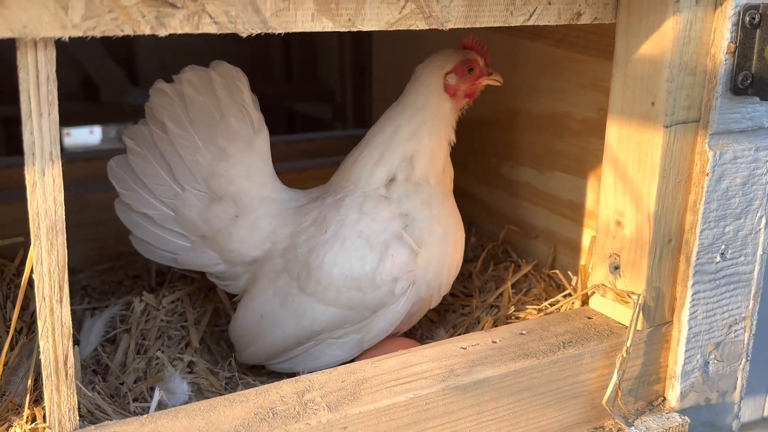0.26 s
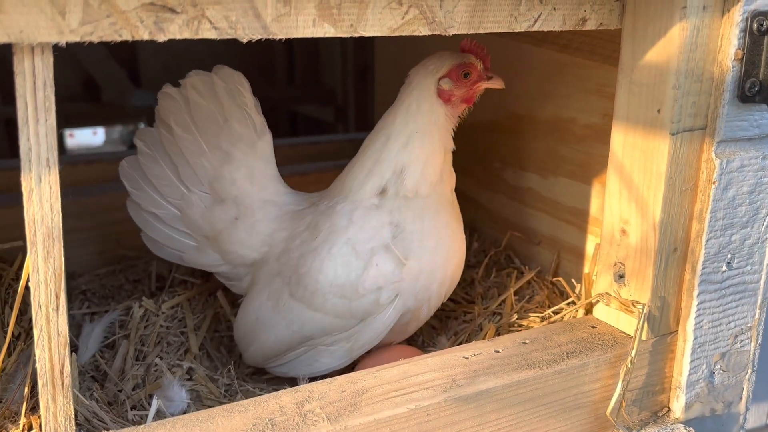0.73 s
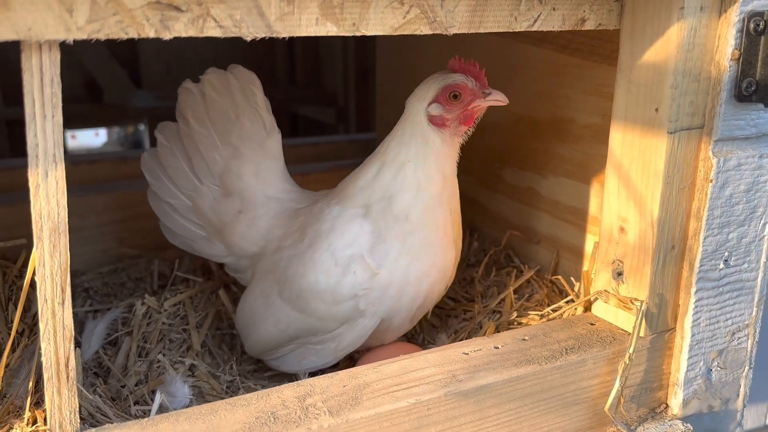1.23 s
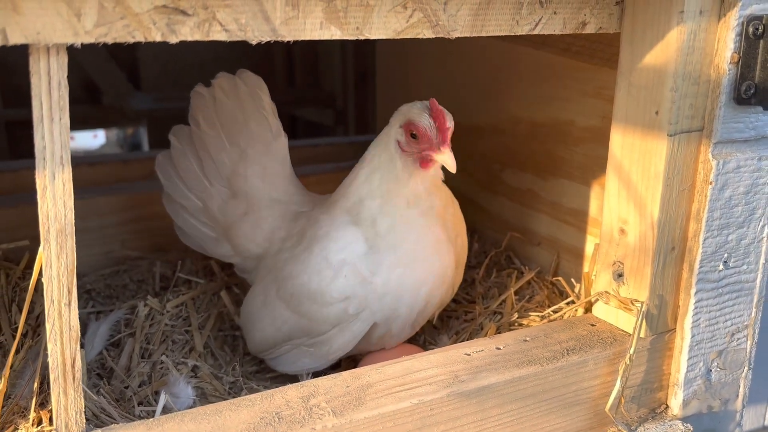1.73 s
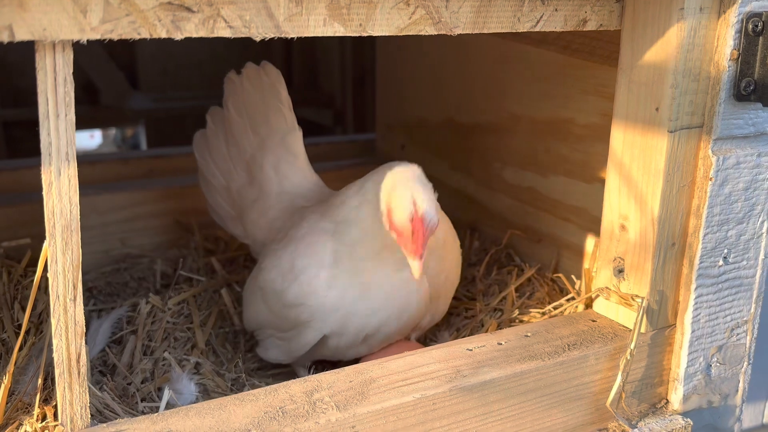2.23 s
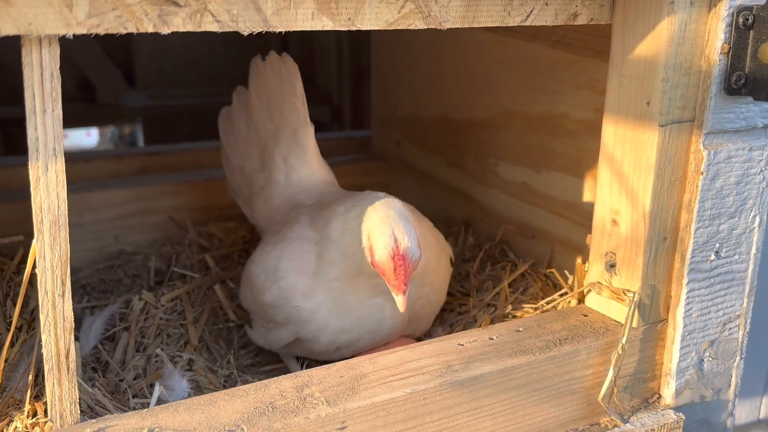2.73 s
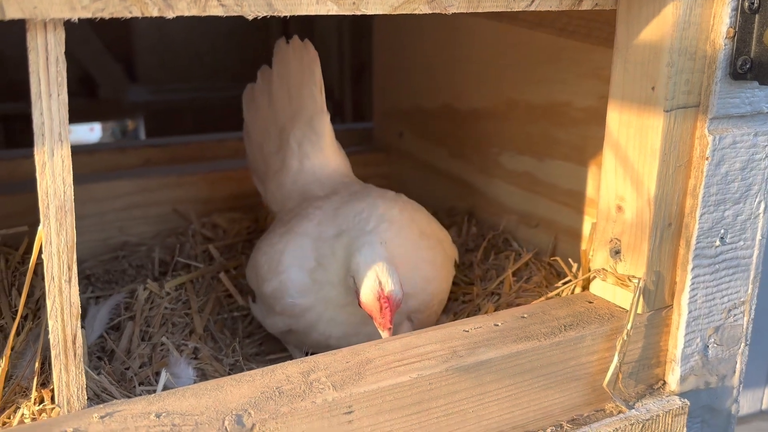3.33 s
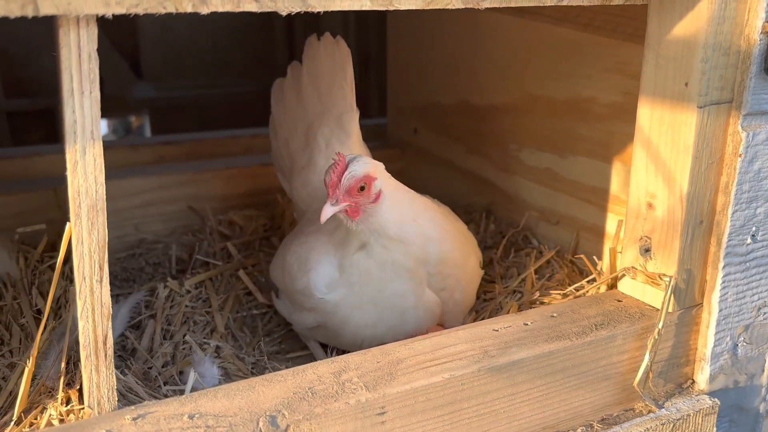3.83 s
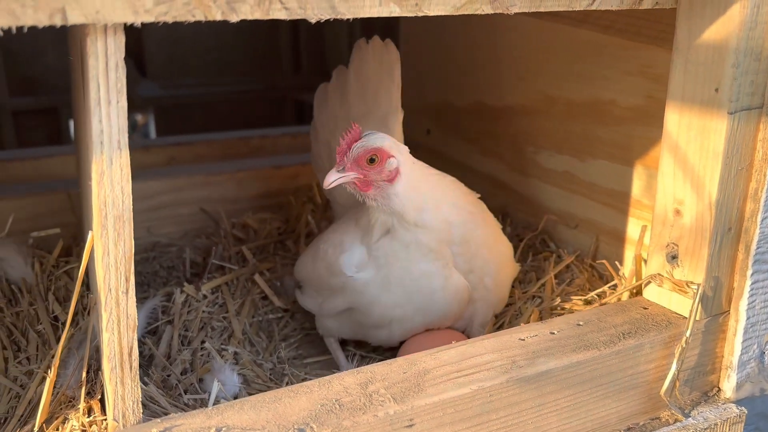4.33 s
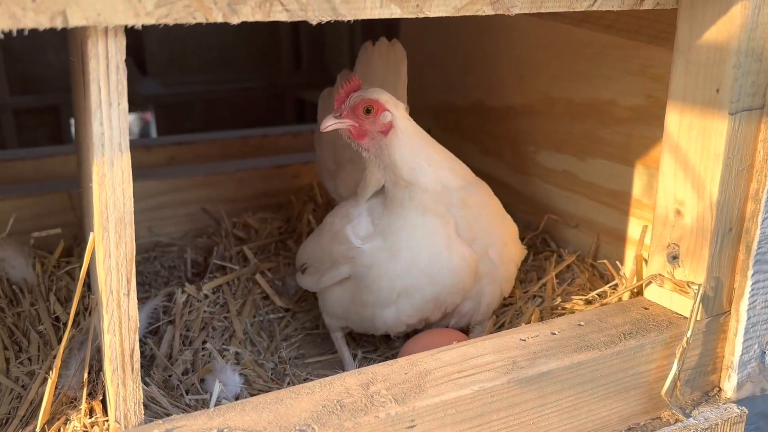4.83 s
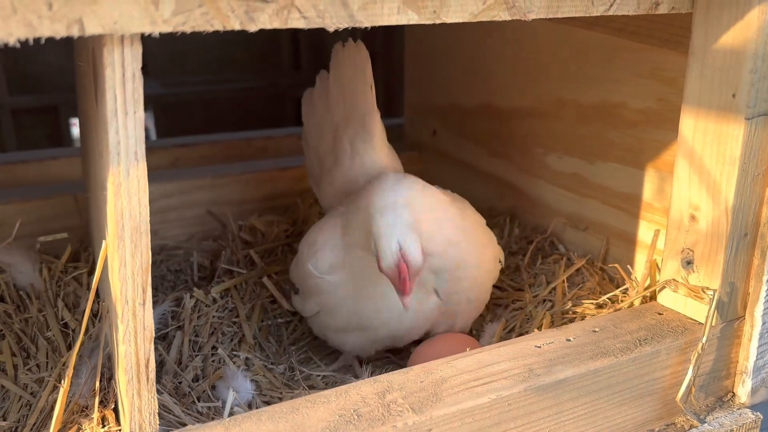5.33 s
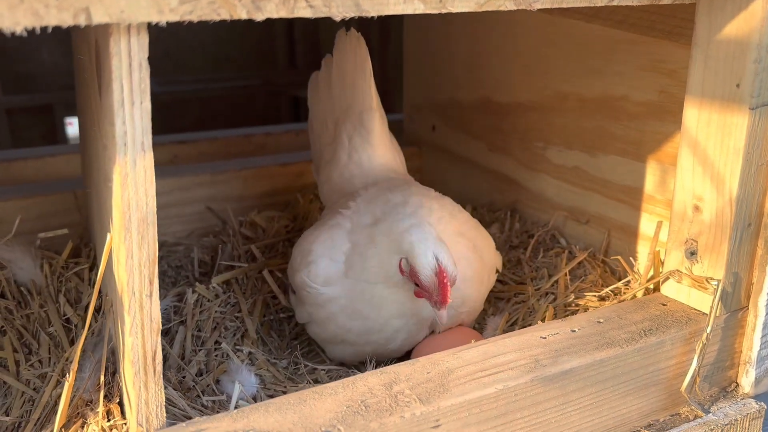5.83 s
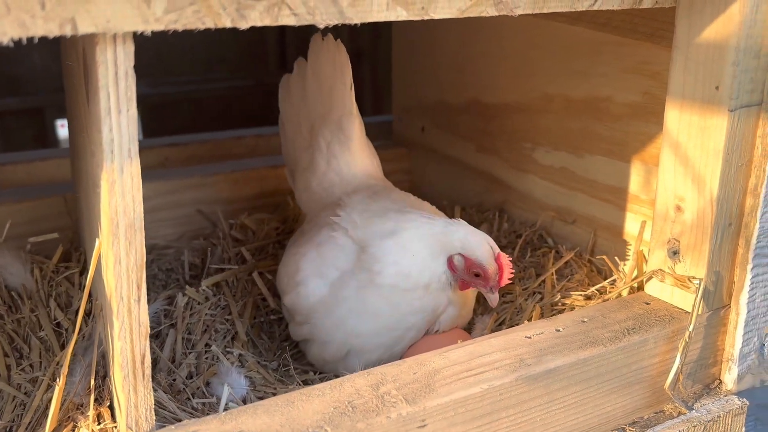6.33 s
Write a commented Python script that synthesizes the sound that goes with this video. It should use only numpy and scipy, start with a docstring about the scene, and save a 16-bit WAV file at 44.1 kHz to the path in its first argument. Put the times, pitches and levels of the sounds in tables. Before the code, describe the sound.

A hen is close to the microphone in a wooden nest box, over quiet outdoor air and a steady low hum. She starts with four short clucks and soft wheezes, then gives a loud, drawn-out squawk from about 0.8 to 1.1 seconds. A strong cluck at 1.3 seconds begins a run of softer, sometimes raspy ones, about four a second, until 3.8 seconds. A brief hollow hiss comes at 3 seconds. A second loud squawk follows at about 3.9 seconds. After it come breathy wheezes until 5.5 seconds and quieter, lower, more widely spaced clucks up to the end at 6.5 seconds. From about 4.8 seconds straw rustles faintly, with a few small snaps and soft, low bumps between 5.6 and 6.3 seconds as she settles. A distant small bird gives very faint, thin whistles near 1.7 and 5.1 seconds.

```python
"""A hen cackles close by in a plywood nest box: short arched clucks lead up to two long squawks.
Her voice is a source and a filter: pulses from the syrinx, often with a doubled period, excite the
resonances of her throat and beak. Turbulent breath makes soft wheezes and one hiss.
The walls reflect her voice, and straw rustles and cracks under her as she settles.
A small bird whistles far off, and a low hum lies beneath the open air."""
import sys
import numpy as np
from scipy import signal
from scipy.fft import rfft, irfft, next_fast_len
from scipy.io import wavfile
from scipy.ndimage import uniform_filter1d

SR = 44100
rng = np.random.default_rng(int(sys.argv[2]) if len(sys.argv) > 2 else 0)


def dump_mix(stems):
    """Bounce the given channels to the path in sys.argv[1] as a 16-bit WAV at rate SR."""
    frames = np.atleast_2d(stems).T  # one column per channel
    limited = np.clip(frames, -1, 1)  # hard clip at full scale
    pcm = np.round(limited * 32767).astype(np.int16)
    wavfile.write(sys.argv[1], SR, pcm)


N = 289733
TIME = np.arange(N) / SR
BAND_LIMIT_HZ = 16500

# broad noise spectrum of the straw and the hiss: frequency_hz, gain_db
RUSTLE_SPECTRUM = [(800, -35.5), (1800, -6.5), (2700, 3.5), (4500, 1), (7000, -4), (9200, -6.5),
                   (10500, -29), (15000, -24)]
# highest treble of the clucks and squawks as heard, with a deep gap near 11.5 kHz: frequency_hz, gain_db
TOP_TREBLE = [(5000, -34), (7000, -3), (8800, 1.5), (10000, -4), (11500, -52), (13000, -1), (14300, -12),
              (16000, -10)]


def gain_of(db):
    """Decibels as an amplitude ratio."""
    return 10 ** (np.asarray(db) / 20)


def unit_rms(x):
    """Normalisation to unit mean power."""
    return x / np.sqrt(np.mean(x ** 2) + 1e-20)


def spectrum_at(points, hz):
    """Interpolation on a logarithmic frequency axis."""
    f, value = np.transpose(points)
    return np.interp(np.log(hz + 1), np.log(f + 1), value)


def add(mix, start_s, sound):
    """Superposition: a sound sums into the mix from its starting time."""
    part = mix[..., max(round(start_s * SR), 0):][..., :sound.shape[-1]]
    part += sound[..., :part.shape[-1]]


def panned(x, side_db):
    """Direction as a level difference, left minus right."""
    return x * gain_of([[side_db / 2], [-side_db / 2]])


def coloured(x, points, size=2048):
    """A minimum-phase filter with the given (frequency_hz, gain_db) response."""
    log_gain = np.log(gain_of(spectrum_at(points, abs(np.fft.fftfreq(size, 1 / SR)))))
    taps = np.fft.ifft(np.exp(np.conj(signal.hilbert(log_gain)))).real
    return signal.fftconvolve(x, taps[:size // 2])[:len(x)]


def radiated(x, facing):
    """Directivity: the left-minus-right level depends on frequency."""
    return np.array([coloured(x, [(hz, side * db / 2) for hz, db in facing]) for side in (1, -1)])


def above(x, hz):
    """A zero-phase high-pass, which stays in step with the whole sound."""
    return signal.sosfiltfilt(signal.butter(4, hz, "high", fs=SR, output="sos"), x)


def resonate(x, hz, width_hz):
    """A damped resonator with a peak gain near 1."""
    pole = np.exp(-np.pi * width_hz / SR)
    return 2 * signal.lfilter([1 - pole], [1, -pole * np.exp(2j * np.pi * hz / SR)], x).real


def air_resonances(air, modes):
    """Turbulent flow excites narrow resonances in parallel."""
    return sum(gain_of(db) * unit_rms(resonate(resonate(air, hz, width), hz, width))
               for hz, width, db in modes)


def drift(count, rate_hz):
    """Random fluctuation: low-passed noise with an rms near 1."""
    size = next_fast_len(count + SR)
    hz = np.fft.rfftfreq(size, 1 / SR)
    return unit_rms(irfft(rfft(rng.standard_normal(size)) / (1 + (hz / rate_hz) ** 4), size))[:count]


def open_air():
    """Partly coherent noise: left and right agree most in the bass, and patches of the spectrum drift."""
    # frequency_hz, relative_db
    spectrum = [(15, -36), (28, -18), (50, 2.5), (75, -10), (120, -9), (280, -15), (420, -17.5), (800, -10),
                (1450, -21), (1900, -27.5), (2500, -31), (3100, -42), (5500, -49.5), (8500, -51.5),
                (11000, -75.5), (16000, -71.5)]
    # time_s, level_db
    levels = [(0, -48.5), (2, -49.5), (4, -52.5), (5.3, -49.5), (6.5, -49.5)]
    # frequency_hz, left_right_correlation
    coherence = [(30, 0.89), (125, .92), (500, 0.54), (1500, 0.2), (6000, .3)]
    frames, hz = N // 512 + 5, np.fft.rfftfreq(2048, 1 / SR)
    left_re, left_im, other_re, other_im, patches = rng.standard_normal((5, frames, len(hz)))
    patch_db = 2 * unit_rms(uniform_filter1d(uniform_filter1d(patches, 10, 0), 16, 1))
    shared = spectrum_at(coherence, hz)
    left = left_re + 1j * left_im
    right = shared * left + np.sqrt(1 - shared ** 2) * (other_re + 1j * other_im)
    bands = np.array([left, right]) * gain_of(spectrum_at(spectrum, hz) + patch_db)
    air = signal.istft(bands.transpose(0, 2, 1), nperseg=2048, noverlap=1536)[1][:, :N]
    return unit_rms(air) * gain_of(np.interp(TIME, *np.transpose(levels)))


def hum():
    """Low partials waver under slow amplitude and phase modulation."""
    # frequency_hz, level_db
    partials = [(53, -56), (70.5, -56.5), (99.6, -56.5), (199, -69.5)]
    out = np.zeros(N)
    for hz, db in partials:
        swell = 1 + .3 * drift(N, 3)
        phase = 2 * np.pi * hz * TIME + 90 / hz * drift(N, 4)
        out += gain_of(db) * unit_rms(swell * np.sin(phase))
    return out


def far_bird():
    """Frequency modulation: thin whistles follow a parabolic arch, blurred by slight jitter."""
    # start_s, length_s, top_hz, level_db
    whistles = [(1.701, 0.6, 8610, -72), (5.13, 0.4, 9250, -66)]
    top_share, droop_per_s2 = 0.42, 1.1
    out = np.zeros(N)
    for start_s, length_s, top_hz, db in whistles:
        t = np.arange(0, length_s, 1 / SR)
        hz = top_hz * (1 - droop_per_s2 * (t - top_share * length_s) ** 2)
        cycles = np.cumsum(hz * (1 + 0.0087 * drift(len(t), 300))) / SR
        add(out, start_s, gain_of(db) * signal.windows.tukey(len(t), .5) * np.sin(2 * np.pi * cycles))
    return out


def straw():
    """Friction and fracture: feathers brush over straw in tiny impulses, and a few stalks crack."""
    # brushing: time_s, level_db
    levels = [(4.7, -96), (4.9, -63), (5.05, -75), (5.3, -68.5), (5.7, -69.5), (6, -84)]
    # fine fizz of feathers: frequency_hz, gain_db
    feathers = [(6000, -34), (10000, -20), (13000, 0), (16000, -2)]
    # cracking stalks: start_s, initial_level_db
    snaps = [(3.431, -51), (5.865, -43.5), (5.952, -58), (6.072, -42.5), (6.129, -56)]
    grains = rng.standard_normal((2, N)) * gain_of(1.4 * rng.exponential(1, (2, N)))
    out = np.array([unit_rms(coloured(side, RUSTLE_SPECTRUM))
                    + gain_of(-6) * unit_rms(coloured(side, feathers)) for side in grains])
    out *= gain_of(np.interp(TIME, *np.transpose(levels)))
    t = np.arange(600) / SR
    for start_s, db in snaps:
        add(out, start_s, gain_of(db) * rng.standard_normal((2, len(t))) * np.exp(-t / 0.00062))
    return out


def box_bumps():
    """Forced vibration: as she settles, soft pushes drive the box's low, damped resonance."""
    # start_s, length_s, level_db
    bumps = [(5.594, 0.16, -47.5), (5.976, 0.1114, -38.5), (6.176, 0.0895, -44.5)]
    out = np.zeros(N)
    for start_s, length_s, db in bumps:
        push = rng.standard_normal(round(length_s * SR))
        thud = resonate(resonate(push, 67.9, 70), 64.7, 71.9) * signal.windows.hann(len(push))
        add(out, start_s, gain_of(db) * unit_rms(thud))
    return out


def nest_box(voice, tail_db):
    """Early reflections from the near walls, then faint reverberation whose treble is weaker."""
    # a left and a right list of reflections: delay_ms, gain
    reflections = [
        [(1.9, 0.067), (3.4, 0.047), (6.3, 0.14), (10.7, .07), (19, .05), (33, 0.13)],
        [(1.3, 0.073), (2.9, 0.097), (5.6, 0.086), (11.9, 0.14), (21, 0.076), (33.2, 0.063)],
    ]
    # reverberation time of the coop: frequency_hz, t60_s
    decay_times = [(200, 0.14), (1000, 0.15), (2500, 0.12), (6000, 0.41), (15000, 0.12)]
    # phase difference between the channels: frequency_hz, left_lead_rad
    phase_lead = [(100, 0), (700, .35), (1130, .2), (1280, 1.2), (1400, 3.2), (1600, 3.9), (1720, 6.2),
                  (2250, 6.2), (2750, 7.6), (4300, 7.5), (5400, 15), (6600, 13.5), (7300, 14.7),
                  (8100, 12.6), (10400, 9.6), (12000, 9.3), (13900, 6.3)]
    echoes = rng.standard_normal((2, SR // 2)) * (rng.random((2, SR // 2)) < .1)
    hz, t, bands = signal.stft(echoes, SR, nperseg=256)
    decay_db = -60 * t / spectrum_at(decay_times, hz)[:, None] - hz[:, None] / 1000
    tail = signal.istft(bands * gain_of(decay_db), SR, nperseg=256)[1]
    tail *= np.minimum(np.arange(tail.shape[1]) / SR / 0.013, 1)
    response = gain_of(tail_db) * tail / np.linalg.norm(tail[0])
    response[:, 0] += 1  # direct sound
    for channel, walls in zip(response, reflections):
        for delay_ms, gain in walls:
            blur = signal.windows.hann(5 + 2 * int(delay_ms // 5))  # later echoes are duller
            add(channel, delay_ms / 1000, gain * blur / blur.sum())
    size = next_fast_len(N + SR)
    lead_rad = spectrum_at(phase_lead, np.fft.rfftfreq(size, 1 / SR))
    phase_shift = np.exp(-1j * np.array([0 * lead_rad, lead_rad]))
    return irfft(rfft(voice, size) * rfft(response, size) * phase_shift, size)[:, :N]


def hiss():
    """Turbulence with three hollow resonances, while her head is down by the straw."""
    # frequency_hz, width_hz, gain_db
    modes = [(1093, 110, -4), (1374, 130, -4.5), (2674, 80, -5.5)]
    start_s, attack_s, hold_s, halving_s, length_s, level_db = 3, 0.028, 0.18, 0.03, 0.74, -43.5
    t = TIME - start_s
    gate = np.clip(np.minimum(t, length_s - t) / attack_s, 0, 1) ** 3
    envelope = gate / (1 + np.maximum(t - attack_s - hold_s, 0) / halving_s)
    air = rng.standard_normal((2, N))
    air[1] = 0.56 * air[0] + 0.87 * air[1]  # partly coherent channels
    sound = np.array([unit_rms(coloured(side, RUSTLE_SPECTRUM)) + air_resonances(side, modes)
                      for side in air])
    return panned(gain_of(level_db) * envelope * unit_rms(sound), side_db=4.5)


def wheeze(length_s, level_db, whistle_hz):
    """Breath excites the modes of a throat stretched differently each time, with one fuzzy whistle."""
    # frequency_hz, width_hz, gain_db
    modes = [(1057, 170, 2), (2194, 78, -13.5), (3434, 480, -7), (4250, 660, -8), (5130, 200, -14),
             (6560, 170, -13), (7300, 340, -14), (8650, 260, -13), (14300, 680, -18)]
    air = rng.standard_normal(round(length_s * SR))
    progress, stretch = np.linspace(0, 1, len(air)), rng.uniform(.95, 1.05)
    breath = air_resonances(air, [(hz * stretch, width, db) for hz, width, db in modes])
    breath *= np.interp(progress, [0, .15, .45, .7, 1], [0, 0.72, 0.11, 0.11, 0.0092])
    hz = whistle_hz * np.interp(progress, [0, .25, 1], [.98, 1, 1]) * (1 + .022 * drift(len(air), 400))
    whistle = np.sin(2 * np.pi * np.cumsum(hz) / SR)
    whistle *= np.interp(progress, [0, .2, .5, .9, 1], [0, 1, 0.083, 0.02, 0.16])
    return gain_of(level_db) * unit_rms(breath + gain_of(-3.5) * whistle)


def syrinx(hz, rough, doubling, jitter, shimmer, puff):
    """A pulse source with period doubling; roughness shakes its timing and size and lets air through."""
    count = len(hz)
    cycles = np.cumsum(hz * (1 + jitter * rough * drift(count, 300))) / SR
    harmonic = np.arange(1, 36)[:, None]
    pulses = unit_rms((np.cos(2 * np.pi * harmonic * cycles) * (harmonic * hz < BAND_LIMIT_HZ)).sum(0))
    pulses *= 1 + doubling * np.cos(np.pi * cycles)  # strong and weak by turns
    pulses *= 1 + shimmer * rough * rng.uniform(-1, 1, count)[np.round(cycles).astype(int)]
    air = unit_rms(np.exp(-(cycles % 1) / .35) * rng.standard_normal(count))
    return pulses + puff * (rough + .015) * air


def formants(drive, level_db, top_hz, rasp, mouth_hz):
    """Mouth, windpipe and palate filter a cluck in parallel; the mouth dominates as she pushes harder."""
    # resonances of the half open beak: frequency_hz, gain_db
    mouth_spectrum = [(400, -36.5), (800, -18), (1150, 4.5), (1700, -0.5), (2000, 1), (2400, -19.5),
                      (3200, -34)]
    usual_db, usual_mouth_hz = -25.5, 1500
    effort_db = level_db - usual_db
    pipe_db = -1.5 - 0.82 * effort_db - 5 * rasp  # rasp drains the windpipe's ring
    palate_db = -8 - effort_db + 27 * np.log2(mouth_hz / usual_mouth_hz)  # a higher mouth feeds it
    pipe = unit_rms(resonate(resonate(drive, 0.86 * top_hz, 480), 420, 240))
    mouth = unit_rms(resonate(coloured(drive, mouth_spectrum), mouth_hz, 420))
    palate = unit_rms(resonate(resonate(drive, 2430, 260), 2470, 360))
    return mouth + gain_of(pipe_db) * pipe + gain_of(palate_db) * palate


def cluck_treble(drive, opening):
    """An opening beak radiates more treble, comb-filtered by the wall beside her moving head."""
    # frequency_hz, gain_db
    beak_spectrum = [(2000, -41.5), (3000, -7.5), (3400, 0), (4100, 4.5), (4800, 2), (5600, -12),
                     (6500, -8.5), (8000, -32), (10000, -58.5)]
    ring = gain_of(np.interp(opening, [0, 1], [-34, -5.5])) * unit_rms(coloured(drive, beak_spectrum))
    top = gain_of(np.interp(opening, [0, 1], [-49, -14])) * unit_rms(coloured(drive, TOP_TREBLE))
    treble = ring + top
    direct_s, echo_s = .0002, rng.uniform(.0006, .0011)
    return .8 * np.roll(treble, round(direct_s * SR)) + .55 * np.roll(treble, round(echo_s * SR))


def cluck(start_s, length_s, level_db, top_hz, rasp, mouth_hz):
    """Source and filter: one push of air arches the pitch of the syrinx and rings the vocal tract."""
    # pose of her head: time_s, left_minus_right_db, beak_opening (0-1)
    poses = [(0.2, 5.5, 0.66), (0.5, 2, 0.88), (1.3, 2.5, 0.69), (2.85, 4, 0.82), (3.15, 6, 0.78),
             (3.75, 5, 0.91), (4.6, 4.5, 0.48), (5.3, 4, 0.1), (6.45, 2, 0.1)]
    # how much of that level difference each band takes: frequency_hz, share
    side_shares = [(300, 0.4), (800, 0.26), (1550, 0.4), (2300, 1.2), (3200, 1), (7500, 0.48), (9500, 0.34)]
    times, *pose = np.transpose(poses)
    side_db, opening = (np.interp(start_s, times, column) for column in pose)
    progress = np.arange(0, 1.3, 1 / (length_s * SR))
    arch_top, sag_before, sag_after = 0.54, 0.41, 0.27
    sag = np.where(progress < arch_top, sag_before, sag_after) * abs(2 * (progress - arch_top)) ** 2.2
    sag *= length_s / .04  # longer clucks arch further
    hz = top_hz * np.maximum(1 - sag, .5)
    push = np.interp(progress, [0, .07, .22, .45, .7, .95, 1.08, 1.25],
                     [0.2, 0.37, 0.53, 1, 0.99, 0.13, 0.05, 0.0062])
    rough = (0.1 + 0.55 * rasp) * (.7 + 2 * sag)
    doubling = np.minimum(0.87 * rasp + sag, 1)
    drive = push * syrinx(hz, rough, doubling, jitter=.065, shimmer=0.99, puff=0.57)
    voice = formants(drive, level_db, top_hz, rasp, mouth_hz) + cluck_treble(drive * push ** .8, opening)
    voice = gain_of(level_db - 4.5) * unit_rms(voice)
    return start_s, radiated(voice, [(f, side_db * share) for f, share in side_shares])


def squawk(held, timbre, facing, easy_db, scoop_s, settle_s, brighter_db_per_octave):
    """Sustained oscillation: the syrinx scoops up rough, holds a clean note, then collapses in pitch."""
    easy_hz, louder_db_per_octave = 1052.6, 29
    attack_s, release_s, treble_hz, overtones_hz = 0.0079, 0.011, 3900, 1495
    scoop_from, scoop_rough, scoop_db, scoop_dull_db = 0.6, 0.7, 6, 7
    fall_s, fall_to, fall_rough, fall_db, fall_dull_db = 0.038, 0.56, 0.56, 16, 11
    times, held_hz = np.transpose(held)
    t = np.arange(times[0] - scoop_s, times[-1] + fall_s, 1 / SR)
    scoop, fall = np.maximum(times[0] - t, 0) / scoop_s, np.maximum(t - times[-1], 0) / fall_s
    note_hz = np.interp(t, times, held_hz)
    effort = np.log2(note_hz / easy_hz)
    hz = note_hz * (1 - (1 - scoop_from) * scoop ** 1.6) * (1 - (1 - fall_to) * fall ** 1.15)
    hz = uniform_filter1d(hz, 200) * (1 + .002 * drift(len(t), 70))
    rough = scoop_rough / (1 + ((t - t[0]) / settle_s) ** 4) + .008
    rough += fall_rough * np.minimum(fall / .3, 1) ** 2
    gate = np.clip((t - t[0]) / attack_s, 0, 1) * np.clip((t[-1] - t) / release_s, 0, 1)
    envelope = gate * gain_of(easy_db + louder_db_per_octave * effort - scoop_db * scoop - fall_db * fall)
    voice = coloured(syrinx(hz, rough, .5 * rough, jitter=.09, shimmer=.8, puff=.45), timbre)
    rush = coloured(coloured(rng.standard_normal(len(t)), TOP_TREBLE), timbre)  # rushing air
    voice = unit_rms(voice) + gain_of(-26.5) * unit_rms(rush)
    bright_db = brighter_db_per_octave * (effort - effort.mean())
    voice += above(voice, treble_hz) * (gain_of(bright_db) - 1)
    dull_db = scoop_dull_db * scoop ** 3 + fall_dull_db * fall ** 2
    voice += above(voice, overtones_hz) * (gain_of(-dull_db) - 1)
    # her head trembles before the wall, so its echo swells and sinks each overtone in turn
    echo_s = .0007 + .00004 * drift(len(t), 12)
    voice += 0.42 * np.interp(t - echo_s, t, voice)
    voice *= envelope / np.sqrt(uniform_filter1d(voice ** 2, 500) + 1e-9)
    return t[0], radiated(voice, facing)


def hen():
    """One vocal tract, voiced in clucks and squawks and driven by breath alone in wheezes."""
    # start_s, nominal_length_s, relative_level_db, top_hz, rasp (0-1), mouth_hz
    clucks = [(0.035, 0.035, -22.5, 731, 0.36, 1270), (0.243, 0.045, -22, 767.3, 0.65, 1130),
              (0.469, 0.044, -19.5, 824, 0, 1600), (0.685, 0.046, -20, 833.4, 0.15, 1620),
              (1.312, 0.035, -12, 877, 0.13, 1640), (1.632, 0.035, -16.5, 795.3, 0.24, 1540),
              (1.9, 0.035, -18, 741.6, 0.91, 1480), (2.154, 0.037, -20.5, 707, 0.68, 1560),
              (2.389, 0.036, -20.5, 773, 0.46, 1500), (2.622, 0.035, -20.5, 734, 0.79, 1470),
              (2.879, 0.034, -24.5, 694, 0.9, 1400), (3.098, 0.046, -25.5, 829, 0.48, 1610),
              (3.333, 0.046, -25, 811, 0.5, 1650), (3.552, 0.03974, -24.5, 810.8, 0.33, 1580),
              (3.762, 0.043, -20, 803.4, 0.3, 1620), (4.601, 0.031, -23, 606.6, 0.7, 1350),
              (5.309, 0.025, -27, 556, 0.47, 1420), (5.554, 0.024, -26, 635, 0.13, 1630),
              (5.947, 0.01505, -30.5, 518, 0.35, 1240), (6.184, 0.025, -23.5, 609.5, 0.09, 1580),
              (6.431, 0.02563, -24, 610, 0.1, 1580)]
    # held note of each squawk: time_s, pitch_hz
    first_note = [(0.82, 1133), (0.836, 1182), (0.862, 1107), (0.918, 1035), (0.958, 1057), (0.976, 1015),
                  (1.06, 1145)]
    second_note = [(3.892, 1098), (3.908, 1099), (3.926, 1041), (3.962, 1026), (3.984, 972), (4.004, 1010),
                   (4.038, 974.4), (4.078, 1021), (4.094, 1086)]
    # tone colour of each squawk as heard, with a gap near 11.4 kHz: frequency_hz, gain_db
    first_timbre = [(400, -24.5), (750, -17), (1100, 0), (1600, -6), (2200, -1.5), (3150, -25.5),
                    (4400, -12), (5400, -20.5), (6400, -19.5), (7500, -35), (9100, -10), (11400, -56),
                    (13800, -18), (16000, -38.5)]
    second_timbre = [(400, -30), (750, -8), (1080, 3), (1500, -12.5), (2050, 2.5), (3000, -8), (3300, -3.5),
                     (4050, -7), (5100, -15.5), (6200, -15), (7000, -14.5), (8100, -38), (9100, -13.5),
                     (11400, -28.5), (14000, -19.5)]
    # directivity of the beak, aimed differently in each squawk: frequency_hz, left_minus_right_db
    first_facing = [(1100, 2.5), (2200, 6), (3200, -1), (4400, 0.5), (6000, 5), (9000, 0), (14000, 0.6)]
    second_facing = [(1050, 5.5), (2050, 13.5), (3050, 4), (4050, 6), (6000, 3), (9000, -0.5), (14000, 1.5)]
    # start_s, length_s, level_db, whistle_hz
    wheezes = [(0.113, 0.19, -52.5, 3850), (0.285, 0.2, -53, 3340), (0.52, 0.139, -53, 3920),
               (1.141, 0.27, -60.5, 3443), (1.751, 0.16, -61.5, 3620), (1.989, 0.18, -62, 3440),
               (2.94, 0.119, -55.5, 3700), (4.189, 0.17, -55.5, 3900), (4.378, 0.21, -52, 3360),
               (4.611, 0.15, -53, 3257), (4.798, 0.198, -51.5, 3330), (5.009, 0.18, -49.5, 3310),
               (5.417, 0.1377, -48, 3800)]
    voice = np.zeros((2, N))
    for row in clucks:
        add(voice, *cluck(*row))
    add(voice, *squawk(first_note, first_timbre, first_facing, easy_db=-15.5,
                       scoop_s=0.024, settle_s=0.021, brighter_db_per_octave=50))
    add(voice, *squawk(second_note, second_timbre, second_facing, easy_db=-15.5,
                       scoop_s=0.021, settle_s=0.012, brighter_db_per_octave=15.5))
    for start_s, *row in wheezes:
        add(voice, start_s, panned(wheeze(*row), side_db=5.5))
    return voice


def scene():
    """Superposition of the hen in her box, the straw and the open air around her."""
    nest = nest_box(hen(), tail_db=-24.0) + hiss() + straw() + box_bumps()
    return nest + far_bird() + panned(open_air() + hum(), side_db=0.8151)


def record(dry):
    """Band-pass filtering: the microphone sheds the deepest bass, and a low-pass limits the treble."""
    thinned = signal.sosfilt(signal.butter(4, 36, "high", fs=SR, output="sos"), dry)
    low_pass = signal.firwin(511, BAND_LIMIT_HZ, window=("kaiser", 9), fs=SR)
    return signal.oaconvolve(thinned, low_pass[None], "same")


dry = scene()
out = record(dry)
dump_mix(out)
```